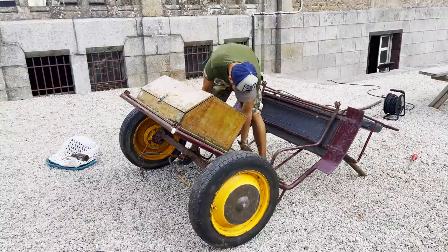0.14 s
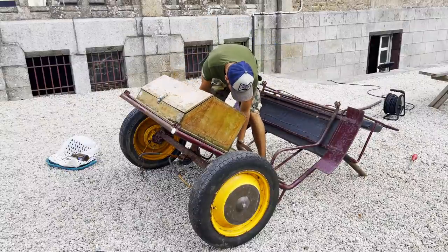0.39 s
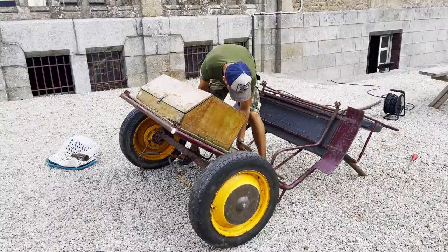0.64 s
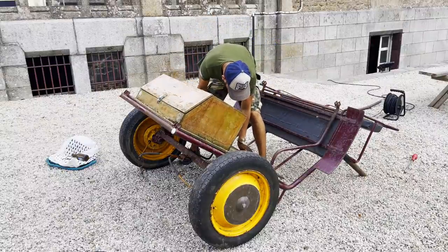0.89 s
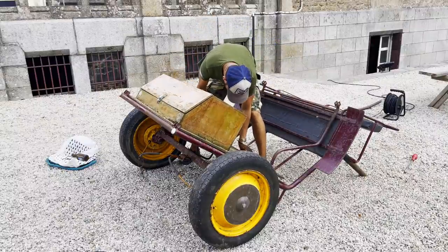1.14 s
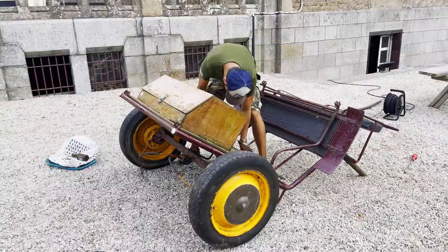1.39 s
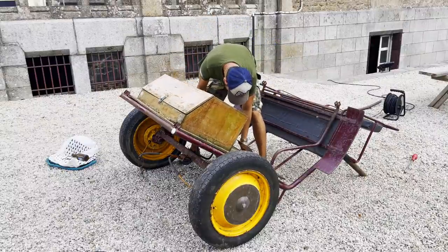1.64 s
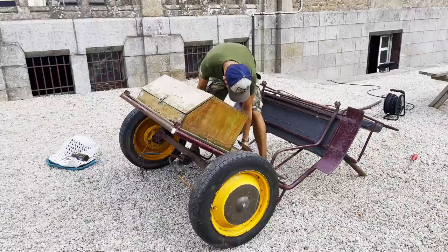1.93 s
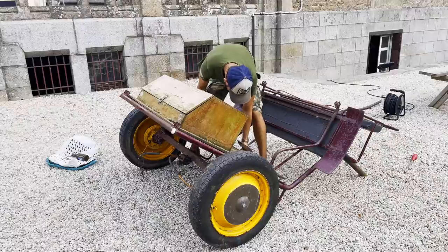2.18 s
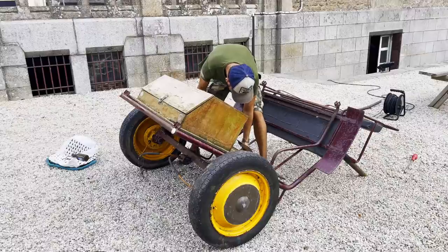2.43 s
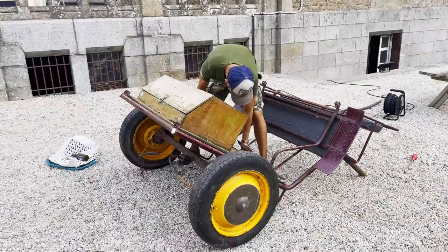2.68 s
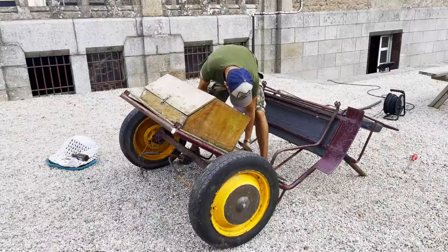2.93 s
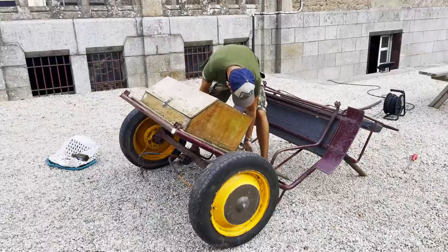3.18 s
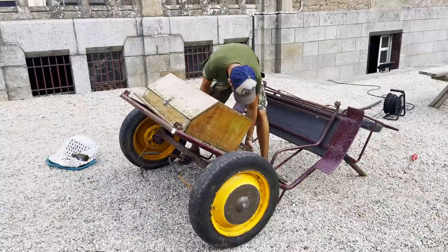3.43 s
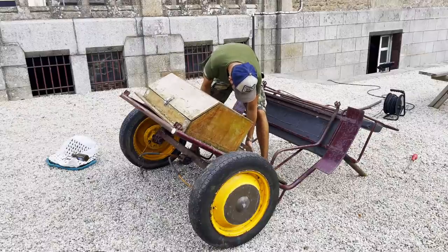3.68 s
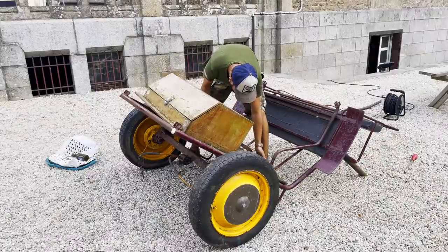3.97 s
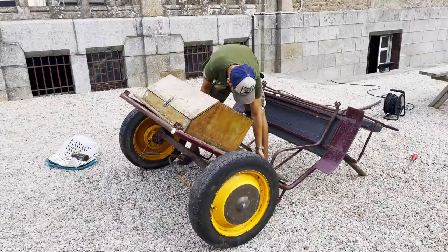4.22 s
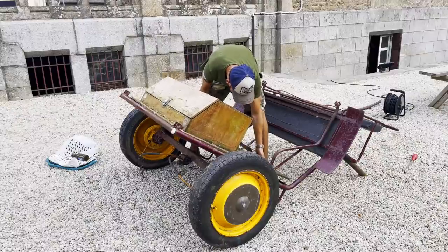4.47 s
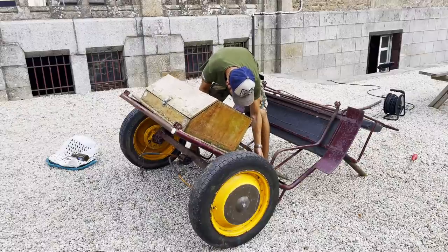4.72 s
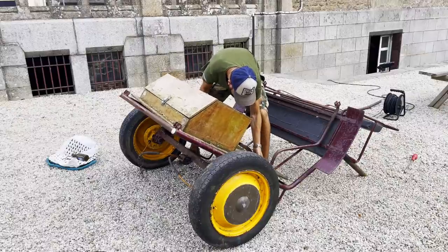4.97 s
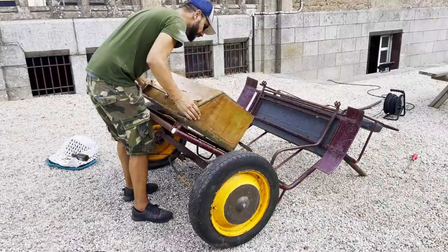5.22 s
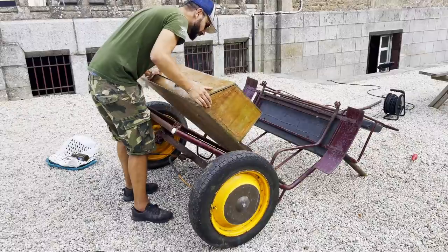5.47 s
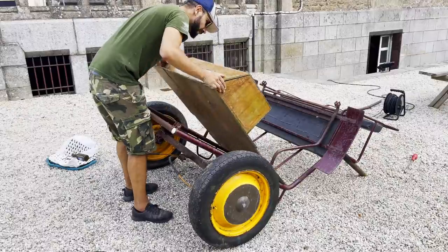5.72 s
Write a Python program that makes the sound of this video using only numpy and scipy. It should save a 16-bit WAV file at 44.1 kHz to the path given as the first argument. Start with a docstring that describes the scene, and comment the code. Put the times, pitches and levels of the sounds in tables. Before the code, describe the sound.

A quiet outdoor hush with slight wind rumble lies beneath a wooden box being moved on a tyred metal cart. A dull thud and soft knock open at 0 s, with gritty rubbing; firmer hollow knocks follow at 0.4 and 0.7 s. From 1.25 to 1.55 s boards rattle and scrape with small metal clacks, then bumps fade to about 2.1 s. A sharp, bright metal crack with a solid thud hits at 2.33 s. The loudest passage runs from 2.85 to 3.2 s: rapid woody bangs, booming frame thuds, clatter and dragging. Near quiet follows, with a soft bump at 3.55 and a knock at 3.73 s. Lighter knocks come at 4.2-4.45 s with faint squeaks, then a short cluster at 5.0-5.2 s. Afterwards only a thin squeak, pebble ticks and trickling grit remain to 6 s. Stone walls return short reflections.

```python
"""A dull thud and a soft knock come first, over outdoor hush: a wooden cart box is shifted on its frame.
Blows force the damped modes of the boards and of the frame on its tyres, which knock and rumble;
friction and loose grit are random click trains, filtered and swelled by each stroke or shove.
Metal clacks, faint squeaks and pebble ticks join them, and ground and walls of a gravel yard reply.
Two microphone ports hear it all, each with its own light wind rumble."""
import sys
import numpy as np
from scipy import signal
from scipy.fft import rfft, irfft, next_fast_len
from scipy.io import wavfile
from scipy.ndimage import uniform_filter1d

SR = 44100
rng = np.random.default_rng(int(sys.argv[2]) if len(sys.argv) > 2 else 0)


def store_pcm(level_fs):
    """Save levels as 16-bit WAV."""
    pcm = np.round(np.clip(level_fs, -1, 1) * 32767).astype(np.int16)
    wavfile.write(sys.argv[1], SR, np.atleast_2d(pcm).T)


def amplitude_ratio(level_db):
    """Convert a level in decibels to the matching linear amplitude (field) ratio."""
    exponent = np.asarray(level_db, float) / 20
    return 10 ** exponent


N = 258867
TIME = np.arange(N) / SR

# Spectrum of the distant hush. Each row: frequency in Hz, relative density in dB per Hz.
HUSH_SPECTRUM = [(15, -26), (25, -14), (65, -0.5), (91, 3), (153, -16.5), (231, -27), (601, -26.5),
                 (666, -30), (2020, -34.5), (7180, -46), (9060, -48.5), (10300, -53.5), (12000, -53.5),
                 (15700, -89), (22000, -120)]
HUSH_DB = -55.5
# Likeness of the hush ahead of the two ports. Each row: frequency in Hz, left-right correlation (0 to 1).
HUSH_LIKENESS = [(40, 0.4), (150, 0.53), (600, 0.2), (2500, 0.2), (9000, 0.38)]

# Whistles of tight joints. Each row: start in seconds, end in seconds, first pitch in Hz,
# last pitch in Hz, level in dB.
SQUEAKS = [(4.018, 4.154, 1404, 1376, -70), (4.51, 4.91, 3354, 3300, -70.5), (4.93, 5.008, 1400, 1380, -64),
           (5.192, 5.417, 5600, 4970, -74), (5.55, 5.674, 4500, 4720, -80)]
# Single pebbles ticking. Each row: start in seconds, relative level in dB.
PEBBLE_TICKS = [(3.975, -71.5), (5.3453, -76), (5.3737, -72), (5.3966, -72), (5.5433, -56.5), (5.5558, -67),
                (5.8247, -70), (5.8561, -64.5)]

# The box rubs along the frame. Each row: full pressure from in seconds, held in seconds,
# sliding level in dB, grit re sliding in dB.
STROKES = [(.07, 0.013, -58.5, -0.5), (0.151, 0.18, -59.5, -4.5), (.41, .37, -65, -6.5),
           (1.11, .13, -67, -29), (1.3, 0.097, -52, -11.5), (1.45, 0.16, -61.5, -12.5),
           (2.36, 0.072, -57.5, -7.5), (2.5, .24, -64, -25.5), (2.93, .22, -53.5, -8),
           (3.0, 0.059, -45, -11.5), (3.22, 0.097, -65, -4.5), (3.4, .12, -74, -5),
           (3.749, 0.0042, -59.5, -5.5), (4.099, .09, -74, -1), (4.24, 0.093, -60, -10.5),
           (4.51, 0.11, -69, -13.5), (4.651, 0.0059, -61, -8.5), (4.77, .09, -61, -5),
           (5.01, 0.081, -62.5, -5.5), (5.11, 0.044, -52, -6.5), (5.17, 0.037, -65, -19),
           (5.68, .01, -68, -12), (5.82, .05, -69, -4.5)]
PRESS_DB_PER_S, LIFT_DB_PER_S = 217.5, 230
SLIDE_REST_DB, GRIT_REST_DB, DUST_REST_DB, DUST_RE_GRIT_DB = -87.5, -86.5, -86, -5.5
# Loose fine grit trickles off. Each row: full flow from in seconds, held in seconds, level in dB.
TRICKLES = [(0.33, 0.017, -78), (3.3, .02, -77), (5.665, 0.017, -63.5), (6.5, .04, -69), (5.8, .07, -75)]
# The cart is shoved. Each row: full push from in seconds, held in seconds,
# rocking of the frame in dB ahead of its high-pass, drag of the boards re rocking in dB.
SHOVES = [(0, 0.034, -37.5, -22), (0.189, 0.76, -51.5, -4), (.62, 0.055, -41.5, -8),
          (1.42, 0.15, -35.5, -12.5), (1.772, .01, -34.5, -41.5), (2.1, .05, -42.5, -25.5),
          (2.25, 0.75, -49.5, -24), (2.9, .1, -34, -24), (3.02, .005, -40, 8.5), (3.09, 0.0085, -23.5, -21),
          (3.17, 0.056, -33, -18), (3.73, 0.016, -37.5, -17.5), (4.269, 0.12, -41.5, -15),
          (4.56, 0.24, -51, -12), (4.84, 0.024, -43, -10), (5.18, 0.0058, -40.5, -2),
          (5.3, .02, -44.5, -36), (5.5, 0.32, -63, -10.5)]
PUSH_DB_PER_S, SETTLE_DB_PER_S, DRAG_STOP_DB_PER_S = 104, 95.5, 168
ROCK_REST_DB, DRAG_REST_DB = -60, -81

# Spectrum of wood sliding on metal. Each row: frequency in Hz, relative density in dB per Hz.
SLIDE_SPECTRUM = [(530, -50), (900, -7.5), (1130, -1), (1880, 0.5), (2080, -3.5), (2290, -2), (3200, -10),
                  (4160, -58.5), (7040, -120)]
# Spectrum of coarse grit. Each row: frequency in Hz, relative density in dB per Hz.
GRIT_SPECTRUM = [(1470, -33), (2500, -1), (2680, -1.5), (3230, -3), (3890, -5.5), (7500, -13),
                 (9750, -48.5), (16500, -120)]
# Spectrum of dust, pebbles and sizzle. Each row: frequency in Hz, relative density in dB per Hz.
SIZZLE_SPECTRUM = [(3820, -29.5), (6500, -13.5), (7870, -9.5), (8110, -9.5), (9330, 0.5), (10300, -1),
                   (11300, -9.5), (12000, -28.5), (15700, -38.5), (22000, -120)]
# Spectrum of hard fittings cracking together. Each row: frequency in Hz, relative density in dB per Hz.
CRACK_SPECTRUM = [(880, -40.5), (1500, -16.5), (2450, 4), (2880, 0), (3670, -3.5), (6150, -13),
                  (7000, -19.5), (9100, -46.5), (15400, -120)]

# Fittings meeting. Each row: start in seconds, relative level in dB, ring in Hz,
# relative level of the sizzle in dB, contact in ms.
CLACKS = [(0.035, -51.5, 3150, -8.5, 21.2), (0.443, -52.5, 3670, -32, 3.53),
          (0.658, -33, 2800, -25.5, 11.3), (0.689, -46, 2600, -32, 21.3), (1.263, -36.5, 2490, -6.5, 27),
          (1.391, -35, 3763, -22, 1.1), (1.417, -32.5, 3560, -36, 0.51), (1.512, -28.5, 4060, -32, 1.06),
          (1.538, -41.5, 2300, -16, 2.9), (1.619, -59, 2514, -21, 2.2), (1.754, -60, 3100, -16, 3),
          (1.788, -64, 2046, -19, 2.3), (1.985, -59, 2330, -25, 3.67), (2.323, -12, 4250, -23.5, 0.35),
          (2.3273, -14.5, 4030, -17.5, 0.76), (2.359, -21.5, 3650, -29.5, .6), (2.38, -43, 2914, -9, 3.2),
          (2.86, -55.5, 3860, -19, 12.5), (2.91, -34, 2290, -7.5, 10), (2.963, -41, 2280, -11, 8.3),
          (2.995, -27.5, 2060, -12, 5.5), (3.019, -37, 2050, -10, 3.7), (3.05, -30, 2050, -13, 4),
          (3.095, -36.5, 2130, -17.5, 6), (3.125, -35, 2220, -11, 3.5), (3.197, -49.5, 4250, -37, 3.4),
          (3.444, -57.5, 2900, -13, 2.2), (3.74, -56, 2630, -22, 12), (4.047, -55.5, 4230, -11, 12.6),
          (4.15, -60.5, 4250, -13, 10), (4.291, -54.5, 3620, 3.5, 1.7), (4.315, -54, 3800, 1.5, 3.3),
          (4.439, -54, 2300, -40, 4.5), (4.808, -49.5, 3480, -4.5, 6), (5.15, -42.5, 2010, -6, 2.7),
          (5.167, -36, 2070, -15.5, 3.6), (5.206, -47, 2215, -9, 3.5)]
# Weight landing on the frame. Each row: start in seconds, relative level in dB, favoured pitch in Hz.
THUDS = [(0.04, -23, 156), (0.102, -26, 132), (0.433, -25, 112), (0.501, -27.5, 81), (0.672, -25, 80),
         (0.77, -32, 81), (1.352, -19.5, 87), (1.42, -19.5, 81), (1.54, -30.5, 110), (1.794, -23.5, 110),
         (1.859, -26.5, 98), (1.989, -24, 60.2), (2.189, -27.5, 62), (2.333, -13.5, 166),
         (2.358, -11.5, 173), (2.686, -21.5, 100), (2.84, -26.5, 157), (2.928, -25.5, 104),
         (2.972, -15.5, 94), (3.001, -12, 104), (3.012, -20, 215), (3.048, -17, 100), (3.133, -20.5, 104),
         (3.209, -23.5, 100), (3.54, -31.5, 65), (3.73, -25, 226), (4.22, -27.5, 81), (4.326, -17.5, 226),
         (4.449, -19.5, 71.6), (4.532, -31, 79.7), (5.008, -25, 70), (5.11, -21.5, 66), (5.167, -25, 105)]
# Blows on the boards. Each row: start in seconds, relative level in dB, letter of the place struck,
# relative hardness in dB per octave, contact in ms.
KNOCKS = [(0.027, -42.5, "a", 0, 2.6), (0.035, -32.5, "a", -3.5, 21), (0.1, -46, "b", -3, 6.1),
          (0.164, -44.5, "g", -10, 3.9), (0.433, -19.5, "c", -14, 4.5), (0.47, -28.5, "c", -18, 3.4),
          (0.657, -22.5, "b", -1, 10.7), (0.69, -28, "b", -9, 13), (0.904, -51.5, "g", -15, 3.3),
          (1.224, -41, "g", -13, 12), (1.255, -18, "d", 2, 27.5), (1.31, -22.5, "d", 2, 7.7),
          (1.345, -23.5, "j", -4, 7.5), (1.416, -33.5, "f", -1, 2.65), (1.45, -31, "d", -12.5, 3),
          (1.513, -34, "f", -2.5, 2.5), (1.537, -24.5, "h", -1.5, 2.78), (1.62, -43, "d", -5, 1.67),
          (1.752, -43.5, "c", -6.5, 3.2), (1.787, -37.5, "h", -5, 3.8), (1.936, -47.5, "d", -13, 5.3),
          (1.986, -40.5, "g", -13, 3.2), (2.057, -51, "f", -6.5, 5.2), (2.127, -53, "g", -2, 6.1),
          (2.325, -20, "i", 2.5, 4.5), (2.357, -20, "i", -2.5, 4.6), (2.686, -34, "f", -3.5, 2.2),
          (2.836, -29.5, "d", -4.5, 3.5), (2.905, -13.5, "e", 1.5, 11), (2.96, -17, "f", -2, 6),
          (2.995, -16.5, "c", -3.5, 4.85), (3.019, -25, "a", -4, 2.5), (3.052, -23, "c", -2.5, 5),
          (3.093, -24, "c", 0.5, 3.85), (3.125, -24.5, "c", -6, 8.7), (3.195, -24.5, "c", -15, 5.1),
          (3.536, -43.5, "g", -12.5, 2.32), (3.725, -30.5, "a", -6, 4.84), (4.215, -35, "h", -10, 28),
          (4.325, -30, "c", -13, 5.4), (4.438, -35, "e", 1, 1.6), (4.465, -35.5, "a", -4, 2.4),
          (4.997, -37.5, "h", -4, 13.6), (5.047, -33.5, "a", -18, 10.4), (5.15, -26.5, "e", -0.5, 3.3),
          (5.169, -28.5, "e", -10, 1.8), (5.2, -38.5, "e", 0, 3.8)]
# Places on the box, by letter. Each entry: low pitch that answers best in Hz, high one in Hz,
# their lead over the rest in dB.
SPOTS = {"a": (244, 1900, 7), "b": (400, 3010, 10), "c": (290, 1256, 8.5), "d": (430, 760, 12.2),
         "e": (365, 1162, 6.9), "f": (570, 1150, 7.8), "g": (575, 830, 8.4), "h": (250, 810, 7),
         "i": (617, 873, 11), "j": (620, 1000, 15.2)}
# Modes of the boards. Each row: frequency in Hz, relative level in dB, decay by 60 dB in seconds.
BOARD_MODES = [(255.4, -5, 0.11), (288.7, -5.5, 0.087), (330, 1, .18), (373.4, -2.5, 0.17),
               (404.2, -8, .15), (428.9, -6.5, 0.16), (505.3, -5, 0.094), (548.3, 0.5, 0.093),
               (602.5, -5, 0.097), (707, -14.5, 0.27), (764.8, -5.5, 0.15), (854, -7.5, 0.057),
               (942, -18, 0.19), (1024.7, -10.5, 0.13), (1073.4, -5.5, 0.054), (1187.6, -11, 0.075),
               (1282, -11, 0.066), (1444, -9.5, 0.057), (1570, -13.5, 0.03), (1677, -9, 0.07),
               (1922, -12.5, 0.062), (2098, -11.5, 0.046), (2275, -16, 0.056), (2450, -24, 0.08),
               (2560, -14, 0.045), (2809, -13.5, 0.071)]
# Modes of the frame on its tyres. Each row: frequency in Hz, relative level in dB,
# decay by 60 dB in seconds.
FRAME_MODES = [(52, -7, 0.14), (61.6, 5.5, 0.22), (81, -0.5, 0.47), (100, 2.5, 0.36), (110, -0.5, 0.47),
               (132, -0.5, 0.83), (157.7, 1, 0.3), (174.7, -4.5, 0.2), (226, -7.5, 0.34)]

# Echoes off ground, box side and near wall. Each row: left delay in seconds, right delay in seconds,
# level re direct sound in dB.
ECHOES = [(.0045, 0.0045, -10), (.011, .0107, -14), (0.0166, .0169, -20)]
# Reverberation of the yard. Each row: frequency in Hz, decay by 60 dB in seconds.
YARD_DECAY = [(100, 0.86), (500, 0.4), (2000, 0.35), (8000, 0.23)]
YARD_DB = -18.5
# Phase lead of the left port over the right. Each row: frequency in Hz, lead in radians.
PORT_LEAD = [(0, 0), (1720, .5), (2760, 2.3), (3900, .8), (4600, 1.2), (5300, 1.9), (7400, 2.0),
             (8010, -.1), (8870, -.5), (9730, -2.5), (10250, -3.1), (10900, -3.9), (11500, -6.0),
             (11800, -6.3)]
# Level of the left port over the right. Each row: frequency in Hz, difference in dB.
PORT_LOUDER = [(60, 2.0), (140, 1.5), (350, 1.0), (830, 2.5), (2000, 1.0), (4820, 3.0), (11600, 0.5)]


def evened(x):
    """Normalisation to rms 1."""
    return x / np.sqrt(np.mean(x ** 2) + 1e-20)


def read(points, hz):
    """Interpolation of a table over a logarithmic frequency axis."""
    f, value = np.transpose(points)
    return np.interp(np.log(hz + 1), np.log(f + 1), value)


def add(mix, s, sound):
    """Superposition: adds a sound to the mix at s seconds."""
    part = mix[..., round(s * SR):][..., :sound.shape[-1]]
    part += sound[..., :part.shape[-1]]


def colour(x, spectrum):
    """Minimum-phase filtering: a causal response of energy 1 with the given spectrum."""
    hz = np.abs(np.fft.fftfreq(4096, 1 / SR))
    log_gain = np.log(amplitude_ratio(np.maximum(read(spectrum, hz), -90)))
    response = np.exp(log_gain - 1j * signal.hilbert(log_gain).imag)
    taps = np.fft.ifft(response).real[:2048]
    return signal.oaconvolve(x, taps / np.linalg.norm(taps))[:N]


def ring(drives, modes):
    """Modal synthesis: each row of force drives one damped resonator."""
    out = np.zeros(N)
    for drive, (hz, db, t60) in zip(drives, modes):
        radius = 1000 ** (-1 / (max(t60, .02) * SR))
        angle = 2 * np.pi * hz / SR
        feedback = [1, -2 * radius * np.cos(angle), radius ** 2]
        out += amplitude_ratio(db) * signal.lfilter([0, np.sin(angle)], feedback, drive)
    return out


def clicks(per_s, spread_db):
    """Stick-slip as a random point process: uneven clicks of either sign, power 1."""
    size = amplitude_ratio(spread_db * np.minimum(rng.exponential(1, N), 4))
    sign = rng.choice([-1., 1.], N)
    return evened(size * sign * (rng.random(N) < per_s / SR))


def contact(rattle, ms):
    """Impact force: a firm touch, strongest in short blows, in a rattle that swells and dies."""
    u = np.arange(rattle.shape[-1]) / SR * 1000 / max(0.62 * ms, .1)
    force = rattle * u ** 2 * np.exp(-u)
    force = force / np.linalg.norm(force, axis=-1, keepdims=True)
    firm = 0.61 * np.exp(-ms / 7.8)
    touch = np.arange(len(u)) == np.argmax(u > .6)
    return np.sqrt(1 - firm ** 2) * force + firm * touch


def swells(s, held, db, rise_db, fall_db, rest_db):
    """Envelopes linear in dB (rates in dB per s), whose powers add over a resting level."""
    t = TIME[::64, None]
    now_db = db - rise_db * np.maximum(s - t, 0) - fall_db * np.maximum(t - s - held, 0)
    power = (amplitude_ratio(now_db) ** 2).sum(1) + amplitude_ratio(rest_db) ** 2
    return np.interp(TIME, t[:, 0], np.sqrt(power))


def air():
    """Diffuse field: patchy outdoor noise whose left-right correlation depends on frequency."""
    frames, hz = N // 256 + 5, np.fft.rfftfreq(1024, 1 / SR)
    a, b, c, d, patches = rng.standard_normal((frames, 513, 5)).T
    # patches some 600 Hz wide and 80 ms long
    patches = evened(uniform_filter1d(uniform_filter1d(patches, 14, 0), 14, 1))
    same = np.clip(read(HUSH_LIKENESS, hz), -1, 1)[:, None]
    left, other = a + 1j * b, c + 1j * d
    z = np.array([left, same * left + np.sqrt(1 - same ** 2) * other])
    z *= amplitude_ratio(read(HUSH_SPECTRUM, hz)[:, None] + 0.62 * patches)
    hush = signal.istft(z, nperseg=1024, noverlap=768)[1][:, :N]
    return amplitude_ratio(HUSH_DB) * evened(hush)


def buffeting():
    """Turbulence at the ports: independent low-frequency noise under one lumpy envelope."""
    band = signal.butter(2, [22, 60], "band", fs=SR, output="sos")
    lumps_db = 4 * evened(uniform_filter1d(rng.standard_normal(N), 9000))
    rumble = evened(signal.sosfilt(band, rng.standard_normal((2, N))))
    return amplitude_ratio(-54 + lumps_db) * rumble


def squeaks():
    """Narrow-band friction: gliding tones of tight joints, modulated by slow noise."""
    out = np.zeros(N)
    for s, end, hz, end_hz, db in SQUEAKS:
        t = np.arange(s, end, 1 / SR)
        smooth = round(20 * SR / hz)  # the tone holds for about 20 cycles
        fuzz = evened(uniform_filter1d(rng.standard_normal(len(t)), smooth))
        turns = np.cumsum(np.interp(t, [s, end], [hz, end_hz])) / SR
        tone = fuzz * np.sin(2 * np.pi * turns)
        add(out, s, amplitude_ratio(db) * tone * signal.windows.tukey(len(t), .5))
    return out


def pebbles():
    """Impulsive excitation: each stone is a bright noise burst falling 60 dB in 12 ms."""
    train, t = np.zeros(N), np.arange(300) / SR
    for (s, db), burst in zip(PEBBLE_TICKS, rng.standard_normal((len(PEBBLE_TICKS), len(t)))):
        add(train, s, amplitude_ratio(db + 11.5 - 60 * t / 0.012) * burst)
    return colour(train, SIZZLE_SPECTRUM)


def rubbing():
    """Common friction drive: one stroke swells the slide, its grit and the dust; trickles add dust."""
    s, held, db, grit_db = np.transpose(STROKES)
    rates = PRESS_DB_PER_S, LIFT_DB_PER_S
    slide = swells(s, held, db, *rates, SLIDE_REST_DB)
    grit = swells(s, held, db + grit_db, *rates, GRIT_REST_DB)
    dust = swells(s, held, db + grit_db + DUST_RE_GRIT_DB, *rates, DUST_REST_DB)
    trickle = swells(*np.transpose(TRICKLES), *rates, DUST_REST_DB)
    return slide, grit, np.hypot(dust, trickle)


def shoving():
    """Common push: one shove drags the boards and rocks the frame, which settles more slowly."""
    s, held, db, drag_db = np.transpose(SHOVES)
    drag = swells(s, held, db + drag_db, PUSH_DB_PER_S, DRAG_STOP_DB_PER_S, DRAG_REST_DB)
    rock = swells(s, held, db, PUSH_DB_PER_S, SETTLE_DB_PER_S, ROCK_REST_DB)
    return drag, rock


def clacks():
    """Hard impact: fittings give a wide crack, a brief ring round one pitch and a sizzle on top."""
    crack, sizzle, t = np.zeros(N), np.zeros(N), np.arange(1000) / SR
    chatter = rng.standard_normal((len(CLACKS), 6000)) ** 3  # cubed: sparse, spiky
    for (s, db, hz, sizzle_db, ms), rattle in zip(CLACKS, chatter):
        force = amplitude_ratio(db) * np.sqrt(ms) * contact(rattle, ms)
        chime = amplitude_ratio(-60 * t / 0.0051) * np.sin(2 * np.pi * hz * t)
        add(crack, s, amplitude_ratio(10.5) * force)
        add(crack, s, amplitude_ratio(-6) * signal.oaconvolve(force, chime))
        add(sizzle, s, amplitude_ratio(sizzle_db + 15.5) * force)
    return colour(crack, CRACK_SPECTRUM) + colour(sizzle, SIZZLE_SPECTRUM)


def thuds():
    """Soft impact: weight arrives over about 3 ms and forces the frame modes near one pitch most."""
    frame_hz = np.array(FRAME_MODES)[:, 0]
    force = np.zeros((len(FRAME_MODES), N))
    for s, db, hz in THUDS:
        reach_db = -np.minimum(45 * np.abs(np.log2(frame_hz / hz)), 15)
        add(force, s, amplitude_ratio(db + reach_db - 4.5)[:, None] * np.hanning(140) / 70)
    return force


def knocks():
    """Modal excitation: the place struck selects the boards that answer; a soft blow spares high ones."""
    board_hz = np.array(BOARD_MODES)[:, 0]
    force = np.zeros((len(BOARD_MODES), N))
    luck = rng.standard_normal((len(KNOCKS), len(BOARD_MODES)))
    chatter = rng.standard_normal((len(KNOCKS), 4, 6000)) ** 3
    for (s, db, spot, slope_db, ms), place, rattles in zip(KNOCKS, luck, chatter):
        *best_hz, lead_db = SPOTS[spot]
        near = sum(np.exp(-(np.log2(board_hz / hz) / 0.21) ** 2) for hz in best_hz)
        tilt_db = (slope_db + 3.5) * np.maximum(np.log2(board_hz / 450), 0)
        reach_db = lead_db * near + 1.4 * place + tilt_db
        blunt_hz = np.clip(4000 * 2 ** (slope_db / 7), 500, 9000)
        blunt = signal.butter(2, blunt_hz, fs=SR, output="sos")
        pushes = signal.sosfilt(blunt, contact(rattles, ms))
        corners = pushes[np.arange(len(BOARD_MODES)) % 4]  # four corners chatter apart
        add(force, s, amplitude_ratio(db + reach_db - 10.5)[:, None] * corners)
    return force


def cart():
    """Shared resonators: blows and dragging ring the same boards, thuds and rocking the same frame."""
    drag, rock = shoving()
    slide, grit, dust = rubbing()
    slips, grains = clicks(2500, 5.5), clicks(6000, 1.9)
    wobble = rng.standard_normal((len(FRAME_MODES), N))
    low_boards = BOARD_MODES[:17]
    dragged = drag * evened(ring(len(low_boards) * [slips], low_boards))
    rocked = rock * evened(ring(wobble, FRAME_MODES))
    slid = slide * colour(0.57 * slips + 0.77 * grains, SLIDE_SPECTRUM)
    gravel = grit * colour(grains, GRIT_SPECTRUM)
    gravel += dust * colour(clicks(5000, 4.6), SIZZLE_SPECTRUM)
    radiates = signal.butter(3, 62, "high", fs=SR, output="sos")  # too small to radiate lower
    shaken = signal.sosfilt(radiates, ring(thuds(), FRAME_MODES) + rocked)
    return ring(knocks(), BOARD_MODES) + shaken + clacks() + dragged + slid + gravel


def yard(x):
    """Reflection: direct sound and discrete echoes, then a sparse tail that differs between the ears."""
    early = np.zeros((2, SR // 10))
    early[:, 0] = 1
    for left_s, right_s, db in ECHOES:
        early[[0, 1], [round(left_s * SR), round(right_s * SR)]] = amplitude_ratio(db)
    taps = np.zeros((2, SR))
    at = np.arange(900, SR - 20, 20) + rng.integers(0, 20, (2, (SR - 901) // 20))
    np.put_along_axis(taps, at, rng.choice([-1., 1.], at.shape), 1)
    hz, t, z = signal.stft(taps, SR, nperseg=256)
    decay = amplitude_ratio(-60 * t / read(YARD_DECAY, hz)[:, None])
    tail = signal.istft(z * decay, SR, nperseg=256)[1]
    tail = amplitude_ratio(YARD_DB) * (tail + 0.18 * tail[::-1]) / np.linalg.norm(tail[0])
    echoed = signal.oaconvolve(x[None], early, axes=1)[:, :N]
    return echoed + signal.fftconvolve(x[None], tail, axes=1)[:, :N]


def ports(x):
    """Two-channel pickup: phase lead and level difference are split evenly between two microphone ports."""
    size = next_fast_len(N + 4096)
    hz = np.fft.rfftfreq(size, 1 / SR)
    half = np.exp(.5j * read(PORT_LEAD, hz)) * amplitude_ratio(.5 * read(PORT_LOUDER, hz))
    return irfft(rfft(x, size) * np.array([half, 1 / half]), size)[:, :N]


def scene():
    """Superposition of the echoing cart, stones and squeaks with the hush and the wind."""
    sources = cart() + pebbles() + squeaks()
    return ports(yard(sources) + air()) + buffeting()


def band_limit(x):
    """A steep low-pass at the top of the band."""
    return signal.sosfilt(signal.butter(12, 12190, fs=SR, output="sos"), x)


def record(dry):
    """Band limiting: a small microphone's bass roll-off at 40 Hz, and a steep low-pass at 12.2 kHz."""
    edge = signal.butter(8, 12200, fs=SR, output="sos")
    low = signal.butter(4, 40, "high", fs=SR, output="sos")
    mix = signal.sosfilt(low, signal.sosfilt(edge, dry))
    return band_limit(mix)


dry = scene()
out = record(dry)
store_pcm(out)
```